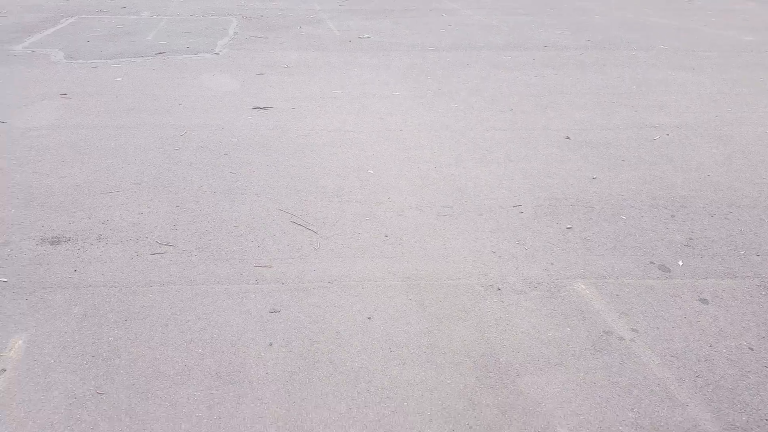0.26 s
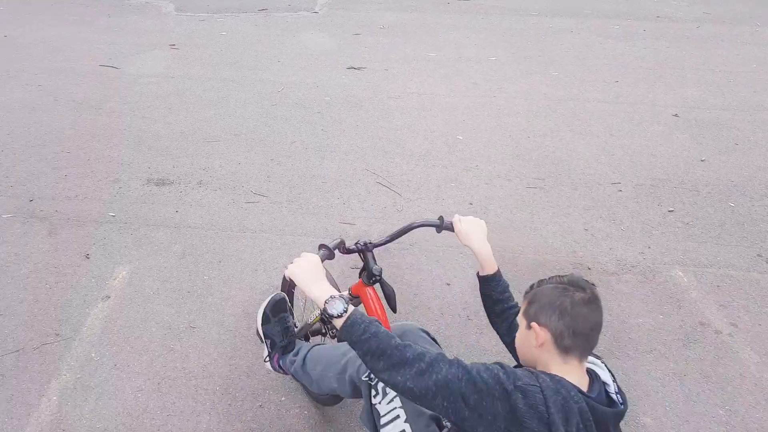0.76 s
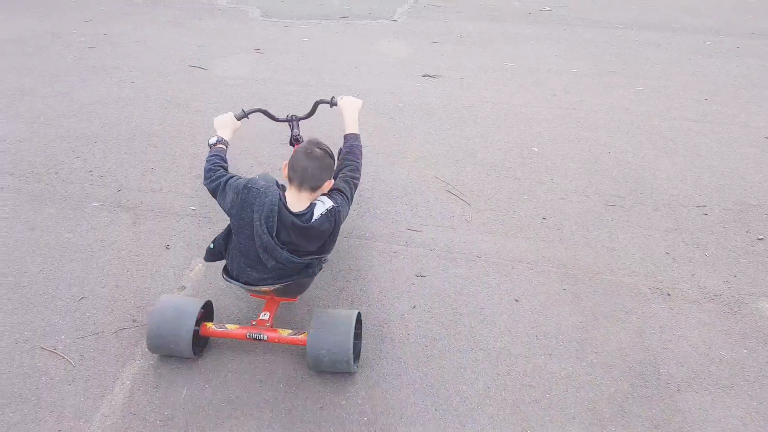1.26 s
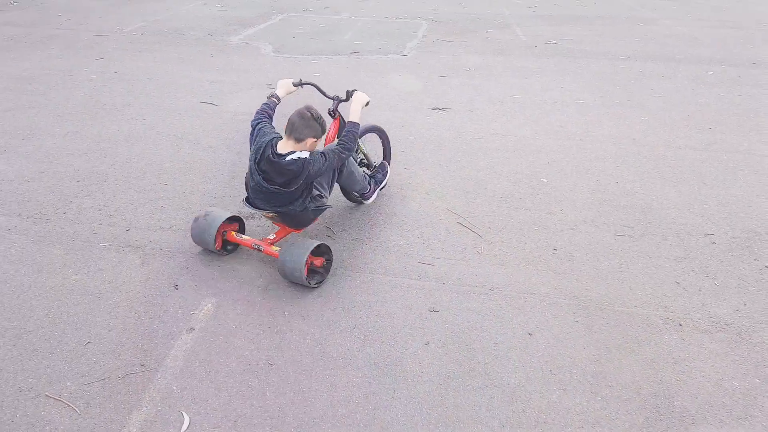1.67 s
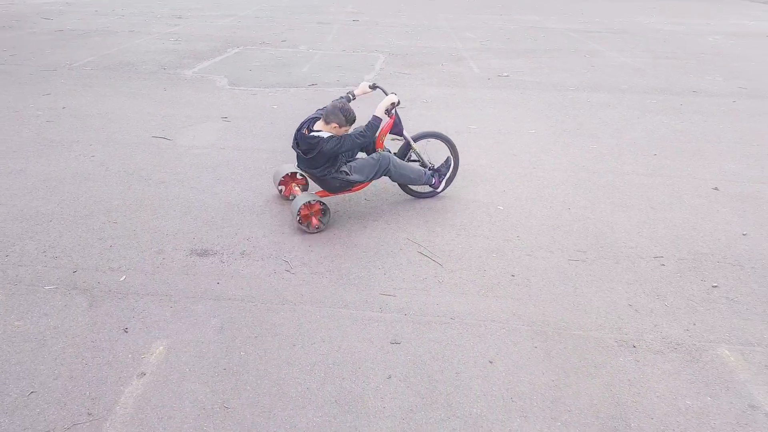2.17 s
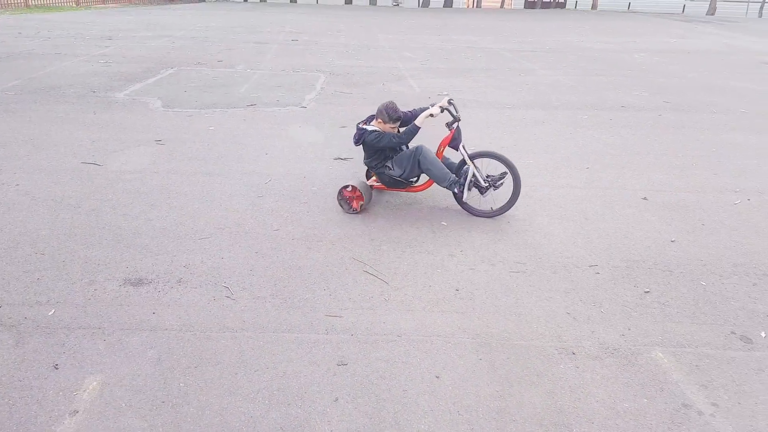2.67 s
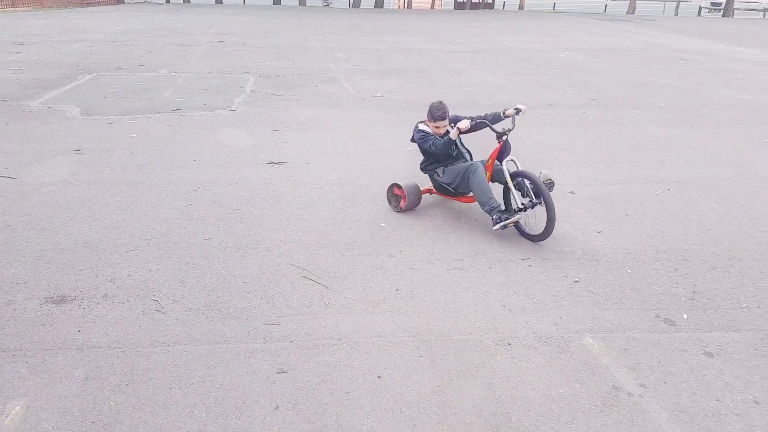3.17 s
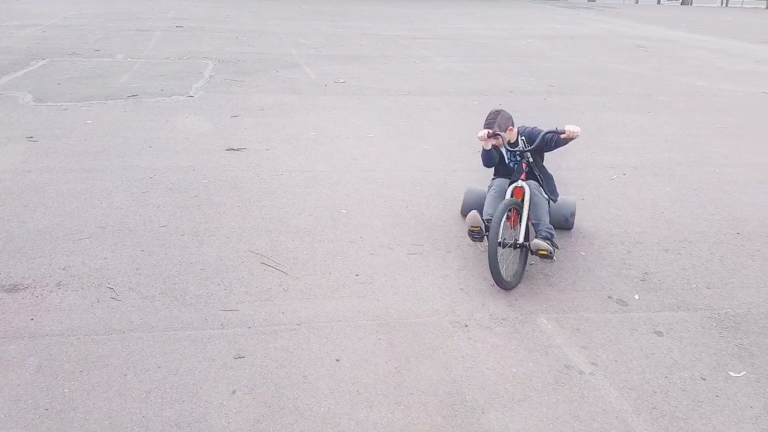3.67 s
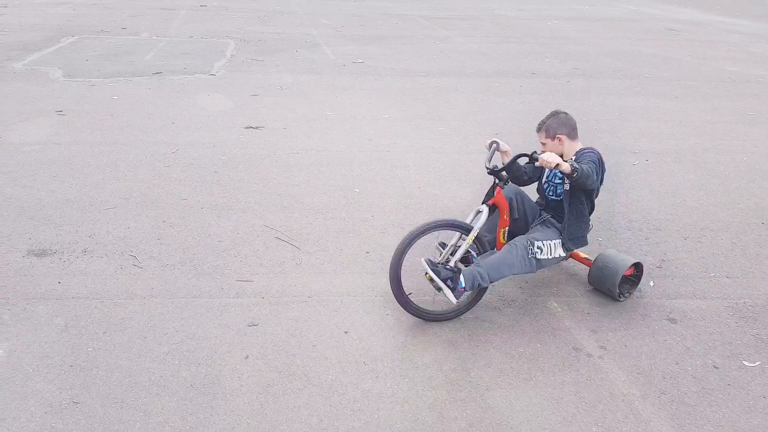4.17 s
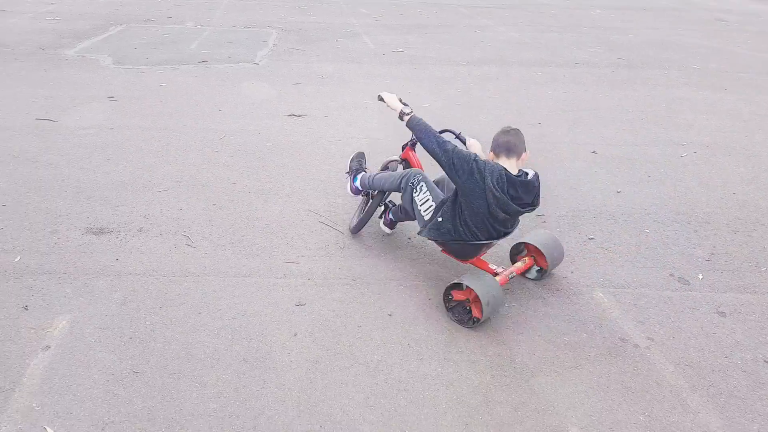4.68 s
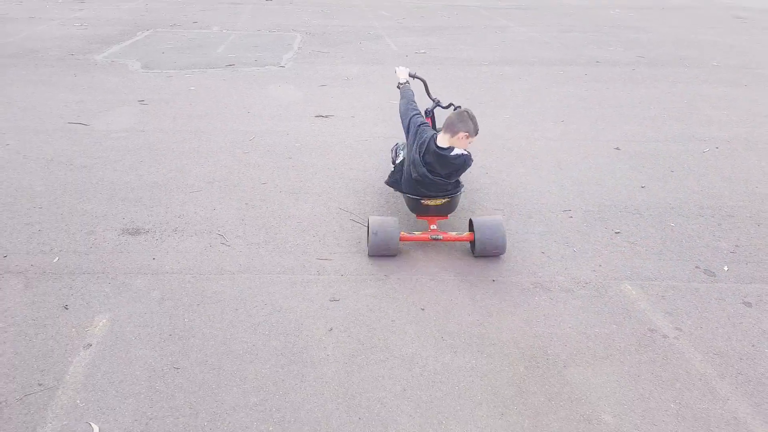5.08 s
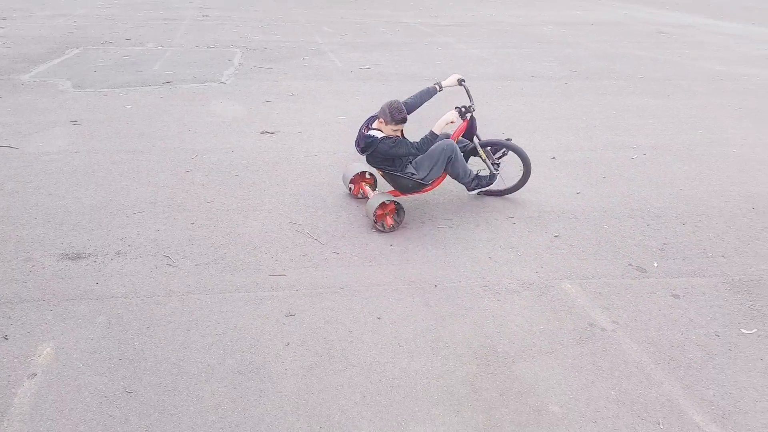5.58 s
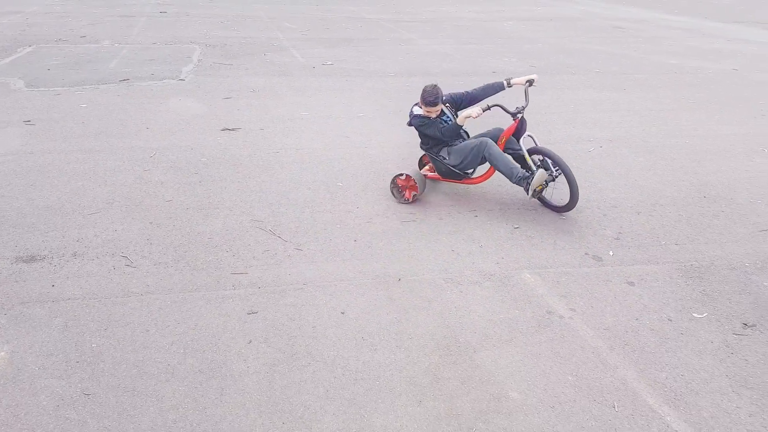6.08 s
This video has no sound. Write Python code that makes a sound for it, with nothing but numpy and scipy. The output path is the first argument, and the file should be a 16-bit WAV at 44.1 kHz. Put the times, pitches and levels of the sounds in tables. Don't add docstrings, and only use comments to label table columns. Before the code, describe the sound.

Hollow plastic wheel sleeves skid continuously over rough car-park ground, scratching and hissing, with quick swells as they dig in. Loose stones tick, crack and crush under them at irregular moments. The trike passes close, moves slightly across the stereo picture, recedes and returns. The sound is dry and open with no echo, over light low wind rumble on the microphones.

```python
import sys
import numpy as np
from scipy import signal
from scipy.fft import rfft, irfft, next_fast_len
from scipy.io import wavfile
from scipy.ndimage import uniform_filter1d, map_coordinates

SR = 44100
rng = np.random.default_rng(int(sys.argv[2]) if len(sys.argv) > 2 else 0)


def put_to_file(sound):
    columns = np.atleast_2d(sound).T
    safe = np.clip(columns, -1, 1)
    whole_steps = np.round(safe * 32767)
    wavfile.write(sys.argv[1], SR, whole_steps.astype(np.int16))


def voltage_ratio(level):
    return 10 ** (np.asarray(level, float) / 20)


N = 279153

# [t/s, level/dB]
WIND_LEVEL = [(0.0, -57.5), (0.42, -63), (1.37, -70), (2.06, -64.5), (3.14, -64), (3.77, -57), (4.34, -62),
              (4.64, -44.5), (4.87, -53), (5.38, -44.5), (5.68, -55.5), (5.94, -49), (6.33, -64)]
# [f/Hz, density/dB]
WIND_SPECTRUM = [(12, -46), (20, -13.5), (86, 0.5), (157, -3), (199, -10), (260, -7), (340, -8),
                 (570, -120)]
# [f/Hz, correlation/0-1]
PORT_LIKENESS = [(250, .93), (700, .99), (1500, .92), (3000, .8), (6000, .66), (14000, .52)]
# [f/Hz, level/dB]
LEFT_OVER_RIGHT = [(60, -1.5), (110, -2.0), (200, -1.0), (380, 0.0), (700, 2.0), (1290, 3.5), (2380, 5.0),
                   (4400, 4.0), (8120, 2.0), (15000, 6.0)]
# [t/s, lag/ms]
LEFT_LAG = [(0, .34), (.4, .3), (.9, 0), (1.5, -.14), (2.8, -.02), (4.2, .14), (5.3, -.01), (6.33, -.02)]
# [t/s, distance/m]
DISTANCE = [(0, 1.12), (.5, 1.64), (1.5, 1.81), (1.9, 2.4), (2.4, 8.4), (3.0, 3.1), (3.6, 3.6), (4.2, 2.9),
            (4.8, 3.5), (5.3, 1.67), (5.7, 6.3), (6.33, 3.5)]
# [t/s, share/0-1]
END_FACING = [(0, 0.1), (.4, 0.15), (1.1, 0.59), (1.5, 0), (2.2, 0.48), (2.6, 0.93), (3.2, 0.56),
              (3.6, 0.84), (4.15, 0.5), (4.45, 0), (4.85, 0), (5.1, 0.8), (5.5, 0.45), (5.8, 0.48),
              (6.33, 0.77)]
# [t/s, lower wall ring f/Hz, upper ring level/dB, contact patch in view/0-1, tail towards us/0-1]
ATTITUDE = [(0, 2380, -21, 0.1, 0), (.26, 2480, -22, 0.3, .2), (.58, 2134, 3.5, 1, 0.13),
            (.81, 2160, -3, 0.7, 0.7), (1.04, 2244, -5.5, 0.04, 1), (1.32, 1863, 0, 0.93, 0.28),
            (1.6, 1854, -0.5, 0.6, 0.64), (2.0, 2080, 2, 1, 0.78), (2.3, 2050, -6.5, .8, 0.85),
            (2.64, 2064, -4, 0.45, 1), (3.15, 2067, -6.5, 0.73, 0.7), (3.6, 2150, -6.5, 0.12, 0.65),
            (3.95, 2200, -2, 0.8, 0), (4.3, 2275, -14, 0.55, 0), (4.75, 2277, -14, 0.85, 0.7),
            (5.1, 2154, -8.5, 0.04, 0.26), (5.8, 2030, -9, 0.61, 0.9), (6.33, 2207, -7, 0.45, 0.77)]
# [t/s, level/dB]
LOAD = [(0, -29.5), (.22, -34.5), (.45, -20.5), (.7, -21), (.88, -28), (1.2, -29), (1.6, -32.5),
        (1.75, -25), (2.2, -28), (2.45, -25), (3.0, -32.5), (3.5, -26.5), (3.7, -22.5), (4.3, -26.5),
        (4.8, -24), (5.05, -29.5), (5.3, -22.5), (6.33, -36.5)]
# [t middle/s, length/s, level over load/dB, extra loose grit/dB]
SURGES = [(0.098, 0.059, 6.5, 1), (0.163, 0.036, 5, 5), (0.297, 0.062, 5.5, 1), (0.487, 0.074, 3, 1),
          (0.608, 0.064, -4, 2), (.77, 0.052, 5, -0.5), (0.958, 0.099, 11, -1.5), (1.082, 0.047, 5.5, 4),
          (1.356, 0.11, 7.5, 0.5), (1.532, 0.063, 4, 0), (1.677, 0.065, 5.5, 3), (1.94, 0.3, 3, -1),
          (2.353, 0.13, 3.5, -1.5), (2.678, 0.066, 3.5, 4), (2.83, 0.033, 6.5, 3), (3.063, 0.048, 13, -4.5),
          (3.155, 0.073, 10.5, 0.5), (3.598, 0.11, 5.5, 0.5), (3.919, 0.084, 3, 4.5), (4.26, 0.091, 2, 3),
          (4.409, 0.063, 7, 2), (4.555, 0.13, 4.5, 0), (4.774, 0.064, 2.5, 3), (4.88, 0.097, 5.5, -4),
          (4.988, 0.047, 9, 0), (5.171, 0.037, 6, -3), (5.377, 0.085, 3.5, 0), (5.58, 0.026, 1.5, 4),
          (5.946, 0.12, 3, 0), (6.26, 0.24, 6, 0.5)]
# [f/Hz, width/Hz]
WALL_RINGS = [
    (2100, 660),
    (3400, 950),
]
# [f/Hz, width/Hz, depth/0-1]
WALL_DIPS = [(547, 133, 0.45), (1640, 59, 0.7), (2450, 160, 0.14), (5450, 370, 0.18), (9180, 590, 0.44)]
# [f/Hz, width/Hz, level/dB]
BORE_END_MODES = [(785, 137, -13), (1094, 66, -2.5), (1240, 390, -17.5)]
# [f/Hz, width/Hz, level/dB]
BORE_SIDE_MODES = [(840, 1110, -9), (1070, 174, -3), (1623, 400, -4.5)]
# [f/Hz, width/Hz, level/dB]
DRUM_MODES = [(334, 240, -1.5), (479, 470, 0.5)]
# [f/Hz, density/dB]
GRIT_SPECTRUM = [(2060, -1), (3500, -3.5), (5130, 1.5), (5920, -6.5), (7480, -7.5), (8240, -12),
                 (9260, -22), (14200, -18.5), (16000, -29), (17000, -30)]
# [t/s, peak level/dB]
KNOCKS = [(.0216, -9), (.1366, -14), (.251, -7), (.4819, -2), (.728, -7), (.7654, -4), (.9244, -15),
          (.9373, -10), (1.3546, -11), (1.6602, -6.5), (1.9796, -10), (2.3954, -7), (3.068, -3.5),
          (3.1314, -11), (3.1467, -7), (3.5994, -8), (3.6904, -8.5), (3.7125, -12), (4.2807, -13),
          (4.431, -24), (4.8547, -20), (4.8793, -3.5), (4.9292, -14), (5.2225, -7), (5.3444, -7),
          (5.4956, -11), (5.5277, -17), (5.9776, -7), (5.989, -10.5), (6.2136, -9.5)]
# [t/s, peak level/dB]
SNAPS = [(.1528, -11), (.1588, -8), (.3208, -12.5), (.3613, -14), (.3876, -15), (.6337, -10.5),
         (.6928, -2.5), (.802, -11), (.9042, -12.5), (1.1201, -11.5), (1.3832, -11.5), (1.474, -15.5),
         (2.1467, -15), (2.5174, -8.5), (2.6012, -9), (2.7998, -17), (2.8381, -14.5), (3.7462, -14),
         (4.2236, -6.5), (4.2541, -10), (4.388, -8.5), (4.568, -27), (4.77, -8), (4.8437, -10), (5.126, -8),
         (5.1701, -15), (5.613, -10), (5.7346, -16.5), (6.2003, -32), (6.235, -15)]
# [t/s, peak level/dB, ring f/Hz, sizzle level/dB]
CRACKS = [(.0357, -14, 6860, 2), (.0586, -19, 5000, 8), (.1007, -11.5, 4640, -3), (.1818, -4.5, 2620, -28),
          (.2387, -8, 2750, -7), (.3098, -5, 2800, -28), (.4207, -8, 2760, -5), (.6045, -21, 4070, -20),
          (.6178, -2.5, 3970, -24), (.6696, -5, 3100, -25), (.996, -5, 3630, -31), (1.7028, -7, 3780, -1),
          (1.75, -5.5, 3250, -8), (1.9, -4, 3720, -29), (2.3615, 0, 2860, -18), (2.661, -7, 2660, -3.5),
          (2.7501, 0, 7550, -9), (2.8303, -9.5, 4360, -12), (3.1569, -9, 3000, -4),
          (3.3419, -11.5, 4300, -1), (3.4497, -7.5, 2800, -22), (3.543, -14.5, 8100, -2),
          (3.9081, -9.5, 3140, 2), (4.5203, -2, 5300, -10), (5.154, -14, 4200, 1), (5.5826, -15, 4530, 4),
          (5.7894, -7.5, 5000, -6), (5.8101, -10, 3700, -8), (5.928, -6, 2820, -19),
          (6.1183, -8.5, 2820, -8.5)]


def unit(x):
    return x / np.sqrt(np.mean(x ** 2) + 1e-20)


def along(points, hz):
    f, v = np.transpose(points)
    return np.interp(np.log(hz + 1), np.log(f + 1), v)


def curves(rows):
    s, *cols = np.transpose(rows)
    return [np.interp(np.arange(N) / SR, s, c) for c in cols]


def wobble(knots_per_s):
    knots = rng.standard_normal(int(N * 200 / SR) + 4)
    return map_coordinates(knots, [np.arange(N) * min(knots_per_s, 200) / SR])


def filtered(x, response):
    n = x.shape[-1]
    m = next_fast_len(n + 4096)
    return irfft(rfft(x, m) * response(np.fft.rfftfreq(m, 1 / SR)), m)[..., :n]


def low_cut(f, corner_hz, order):
    return 1 / (1 + (corner_hz / (f + 1)) ** order)


def ringing(modes):
    def response(f):
        total = 0
        for k, (c, w, db) in enumerate(modes):
            total = total + (-1) ** k * voltage_ratio(db) * 1j * f * w / (c * c - f * f + 1j * f * w)
        return total
    return response


def gliding(x, hz, width_hz, moved_hz):
    band = filtered(x, lambda f: ringing([(hz, width_hz, 0)])(f) ** 2)
    slide = np.exp(2j * np.pi * np.cumsum(moved_hz - hz) / SR)
    return unit(np.real(signal.hilbert(band, next_fast_len(N))[:, :N] * slide))


def pair_noise():
    def split(hz):
        turn = np.arccos(np.clip(along(PORT_LIKENESS, hz), 0, 1)) / 2
        return np.array([np.cos(turn), np.sin(turn)])
    mid, side = filtered(rng.standard_normal((2, N)), split)
    return unit(np.array([mid + side, mid - side]))


def wind():
    lumps = voltage_ratio(1.2 * np.array([wobble(7.8), wobble(9)]))
    rush = filtered(rng.standard_normal((2, N)), lambda f: voltage_ratio(along(WIND_SPECTRUM, f)))
    return voltage_ratio(curves(WIND_LEVEL)[0] + 10.5) * unit(lumps * rush)


def pressure():
    rise_share, flank_steepness = 0.94, 1.47
    s, length, db, loose_db = np.transpose(SURGES)[:, :, None]
    coarse = np.arange(0, N, 44) / SR
    flank = length * np.where(coarse < s, rise_share, 2 - rise_share)
    bumps = np.exp(-abs(2 * (coarse - s) / flank) ** flank_steepness)
    t = np.arange(N) / SR
    surge_db, grit_db = (np.interp(t, coarse, (v * bumps).sum(axis=0)) for v in (db, loose_db))
    return curves(LOAD)[0], surge_db, grit_db


def all_stones(chip_count=70):
    knock_sizzle_db, snap_sizzle_db = -21, -1.5
    chip_db, chip_spread_db, chip_sizzle_db = 11, 2, -12
    wall_hz, pressed_db = curves(ATTITUDE)[0], sum(pressure()[:2])
    when, size, tone, dryness = rng.random((chip_count, 4)).T
    at = ((.005 + .99 * when) * N).astype(int)
    peak_db = pressed_db[at] + chip_db - chip_spread_db * np.log(size + .1)
    ring_hz = wall_hz[at] * (0.875 + tone ** 4)
    chips = zip(at / SR, peak_db, ring_hz, chip_sizzle_db + 14 * (dryness - .5))
    on_wall = []
    for rows, sizzle_db in ((KNOCKS, knock_sizzle_db), (SNAPS, snap_sizzle_db)):
        on_wall += [(s, db, wall_hz[round(s * SR)], sizzle_db) for s, db in rows]
    return [*CRACKS, *on_wall, *chips]


def stones():
    shaded_db = -4
    out, lead = np.zeros((2, N + SR)), 132
    t = (np.arange(700) - lead) / SR
    noise = pair_noise()
    hiss = filtered(pair_noise(), lambda f: voltage_ratio(along(GRIT_SPECTRUM, f)))
    hiss = filtered(hiss, lambda f: voltage_ratio(shaded_db * low_cut(f, 7500, 8)))
    for (s, db, hz, sizzle_db), (spot, long) in zip(all_stones(), rng.random((200, 2))):
        at, start = round(s * SR) - lead, int(spot * (N - len(t)))
        life_s = 0.0008 + 0.0014 * long
        rise = np.exp(np.minimum(t / (.45 * life_s), 0))
        crush = rise * (np.exp(-abs(t) / life_s) + .13 * np.exp(-abs(t) / .008))
        push = crush * noise[:, start:start + len(t)] + 7 * (t == 0)
        ring = filtered(push, ringing([(hz, 0.11 * hz, 0), (1100, 150, -9), (2150, 700, -12)]))
        fizz = crush * hiss[:, start:start + len(t)]
        crack = ring / abs(ring).max() + voltage_ratio(sizzle_db + 4.0) * fizz / abs(fizz).max()
        out[:, at:at + len(t)] += voltage_ratio(db + 0.5) * crack
    return filtered(out[:, :N], lambda f: low_cut(f, 550, 4))


def scratches(share, spread_db, life_s):
    when, luck, chance = rng.random((6000, 3)).T
    sizes = voltage_ratio(-spread_db * np.log(luck + .008)) * (chance < share)
    catches = np.bincount((when * N).astype(int), sizes ** 2, N)
    swell = lambda f: 1 / (1 + 2j * np.pi * f * life_s) / (1 - 2j * np.pi * f * .5 * life_s)
    return unit(np.sqrt(abs(filtered(catches, swell))))


def patchy(x, depth_db):
    z = signal.stft(x, nperseg=512)[2]
    field = uniform_filter1d(rng.standard_normal(z.shape[1:]), size=4, axis=0)
    field = uniform_filter1d(field, size=5, axis=1)
    return unit(signal.istft(z * voltage_ratio(depth_db * unit(field)), nperseg=512)[1][:, :N])


def wall_ring(force, wall_db, lower_hz, upper_db):
    (low_hz, low_width_hz), (high_hz, high_width_hz) = WALL_RINGS
    lower = gliding(force, low_hz, low_width_hz, lower_hz)
    upper_hz = 3204 - .8 * (lower_hz - low_hz) + 60 * wobble(3)
    upper = gliding(force, high_hz, high_width_hz, upper_hz)
    sing_db = -12.5 - (wall_db + 43)
    return lower + voltage_ratio(upper_db) * upper + voltage_ratio(sing_db) * gliding(force, low_hz, 165, lower_hz)


def bore_air(force):
    window = lambda f: low_cut(f, 560, 6) / (1 + (f / 1850) ** 6)
    end = unit(filtered(force, lambda f: ringing(BORE_END_MODES)(f) * window(f)))
    side = unit(filtered(force, lambda f: ringing(BORE_SIDE_MODES)(f) * window(f)))
    facing = np.clip(curves(END_FACING)[0], 0, 1)
    return facing * end + (1 - facing) * side


def grit_hiss(grip, catch, tail):
    fine = scratches(share=.3, spread_db=4, life_s=.0006)
    scrape = patchy(grip * (fine + .5 * catch + 0.37) * pair_noise(), depth_db=3.5)
    grit = unit(filtered(scrape, lambda f: voltage_ratio(along(GRIT_SPECTRUM, f))))
    sheen = filtered(grit, lambda f: low_cut(f, 7000, 8))
    sheen_db = -2 + 13.5 * tail
    return grit + (voltage_ratio(sheen_db) - 1) * sheen


def sliding():
    load_db, surge_db, loose_db = pressure()
    lower_hz, upper_db, view, tail = curves(ATTITUDE)
    far = np.log10(abs(curves(DISTANCE)[0]) + 0.2)
    wall_db = load_db + surge_db
    drum_db = load_db + 1.096 * surge_db - 0.5 - 25 * far
    bore_db = load_db + 1.15 * surge_db - 3 - 7.5 * far
    grit_db = load_db + 0.96 * surge_db - 13.5 + 8 * view + loose_db

    grip = voltage_ratio(0.5 * wobble(30) + 1.0 * wobble(80))
    catch = scratches(share=.5, spread_db=3.6, life_s=.0009)
    force = patchy(grip * (catch + 1.0) * pair_noise(), depth_db=2.5)

    wall = wall_ring(force, wall_db, lower_hz, upper_db)
    bore = bore_air(force)
    drum = unit(filtered(force, lambda f: ringing(DRUM_MODES)(f) / (1 + (f / 600) ** 4)))
    grit = grit_hiss(grip, catch, tail)
    body = voltage_ratio(wall_db - 4.0) * wall + voltage_ratio(bore_db + 0.5) * bore + voltage_ratio(drum_db) * drum
    return body + voltage_ratio(grit_db + 1.0) * grit


def hollowed(f):
    dips = [1 - np.clip(depth, 0, .9) * ringing([(hz, width, 0)])(f) for hz, width, depth in WALL_DIPS]
    return np.prod(dips, axis=0)


def scene():
    pan_db_per_ms = 6
    trike = filtered(sliding() + stones(), lambda f: hollowed(f) * low_cut(f, 130, 4))
    late_ms = curves(LEFT_LAG)[0]
    half_lag = late_ms * SR / 2000
    heard = []
    for port, side in zip(trike, (1, -1)):
        delayed = map_coordinates(port, [np.arange(N) - side * half_lag], mode="nearest")
        heard.append(voltage_ratio(side * pan_db_per_ms * late_ms / 2) * delayed)
    return np.array(heard) + wind()


def low_pass(x):
    return signal.sosfilt(signal.butter(12, 16670, fs=SR, output="sos"), x)


def record(dry):
    top_hz = 15950
    ports = filtered(dry, lambda hz: voltage_ratio(np.outer([.58, -.58], along(LEFT_OVER_RIGHT, hz))))
    hiss = voltage_ratio(-55) * filtered(rng.standard_normal((2, N)), lambda hz: hz / 12000)
    rounded = ports / (1 + abs(ports / .98) ** 5) ** .2 + hiss
    limited = filtered(rounded, lambda hz: .02 * (hz < 16700) + .98 / (1 + (hz / top_hz) ** 200))
    return low_pass(limited)


dry = scene()
out = record(dry)
put_to_file(out)
```